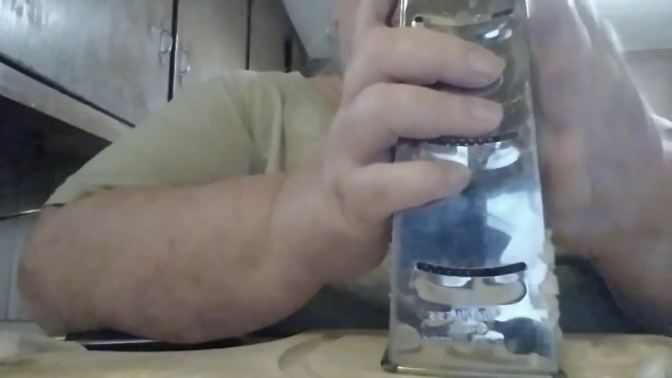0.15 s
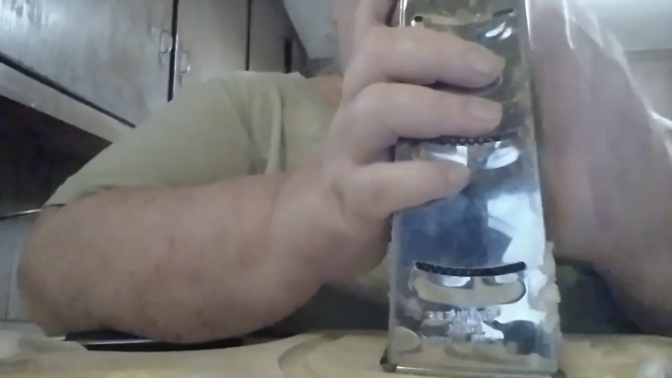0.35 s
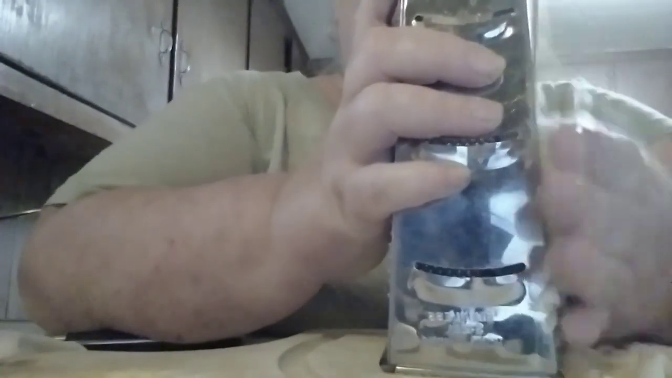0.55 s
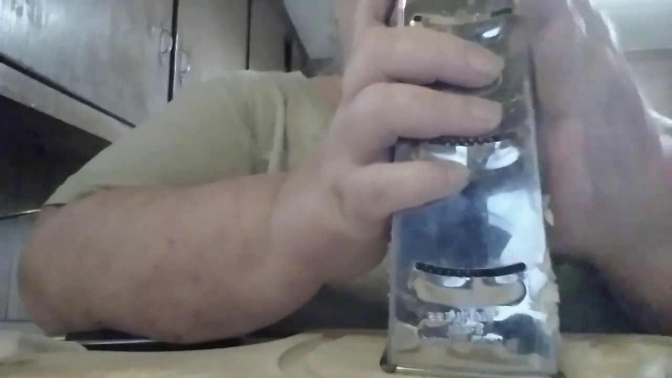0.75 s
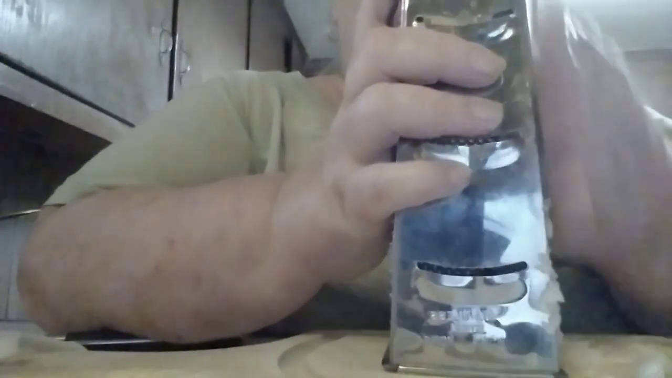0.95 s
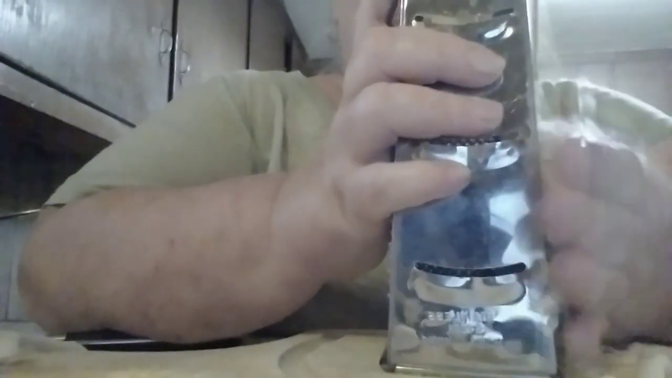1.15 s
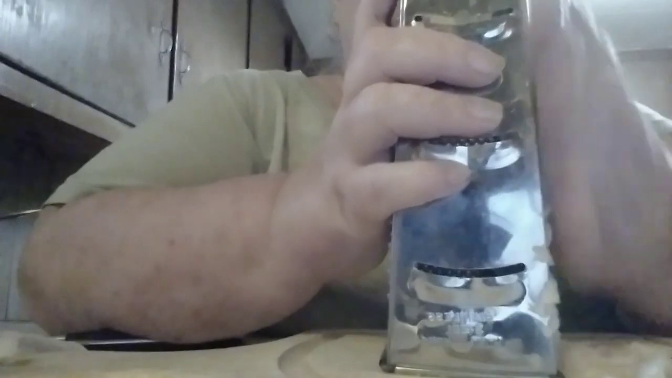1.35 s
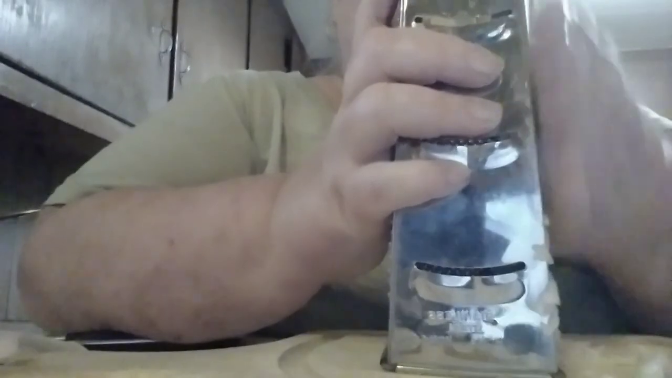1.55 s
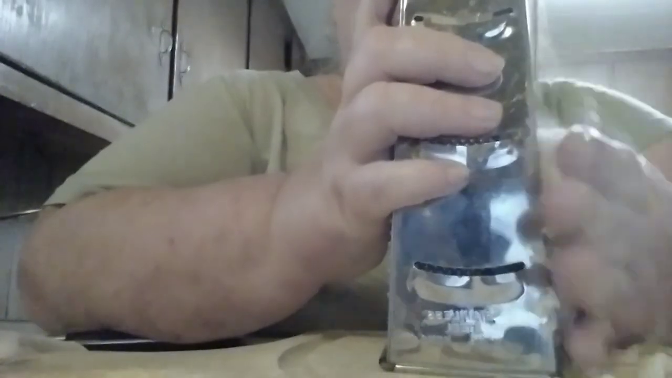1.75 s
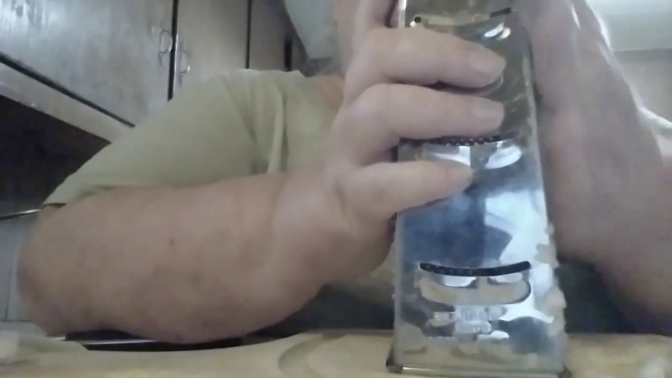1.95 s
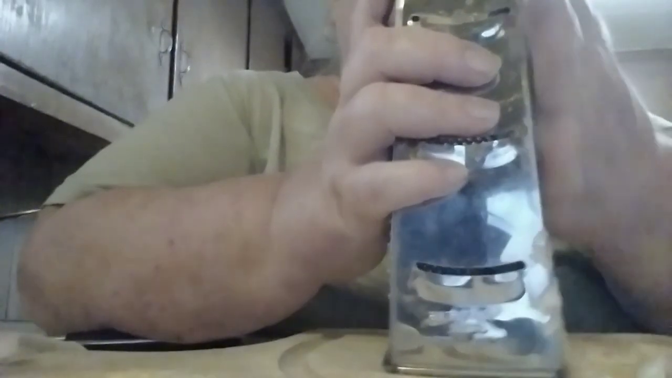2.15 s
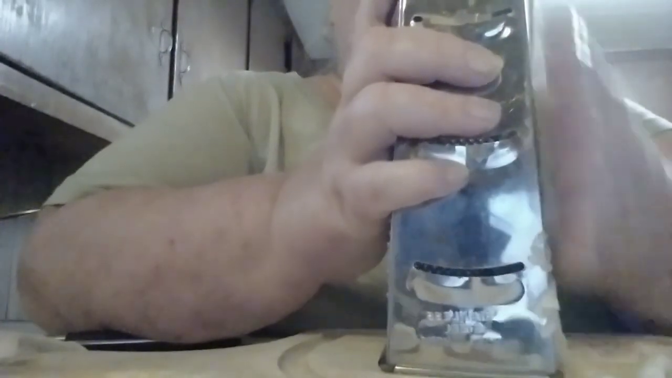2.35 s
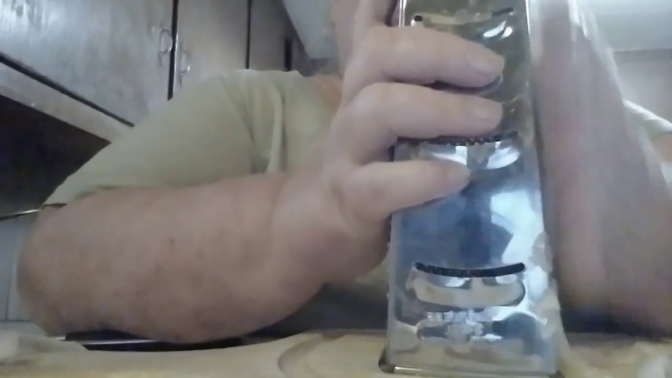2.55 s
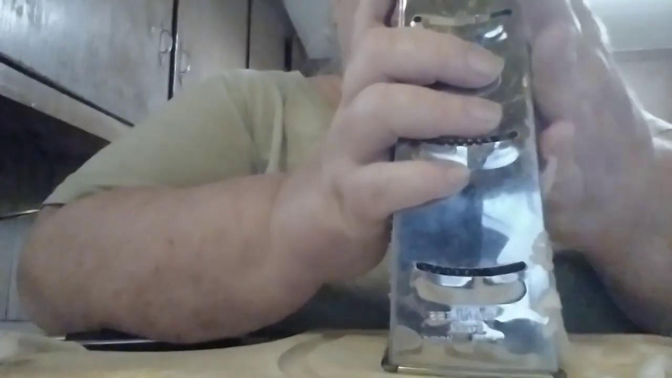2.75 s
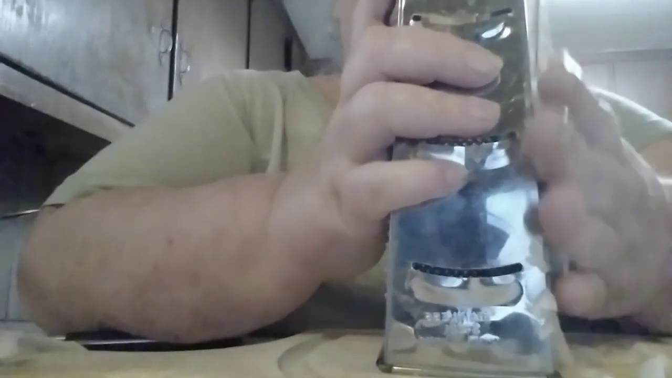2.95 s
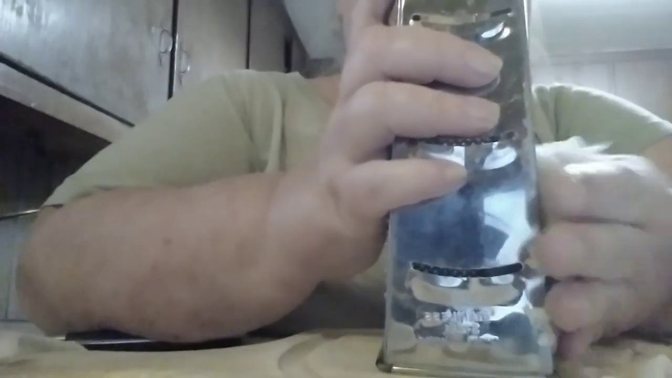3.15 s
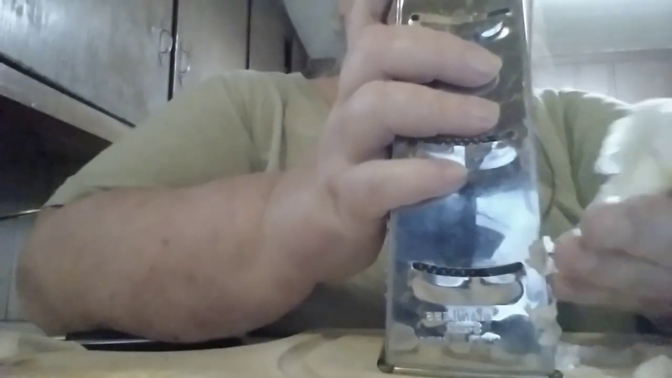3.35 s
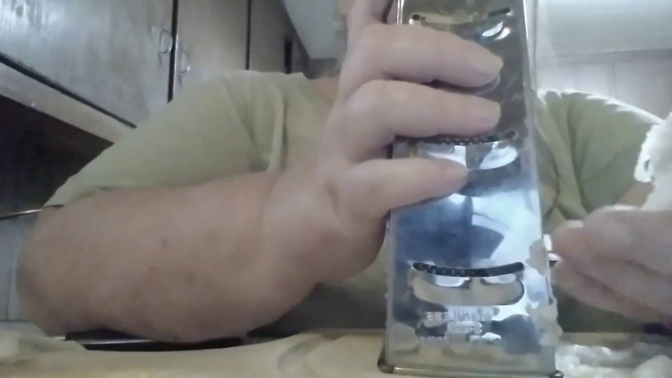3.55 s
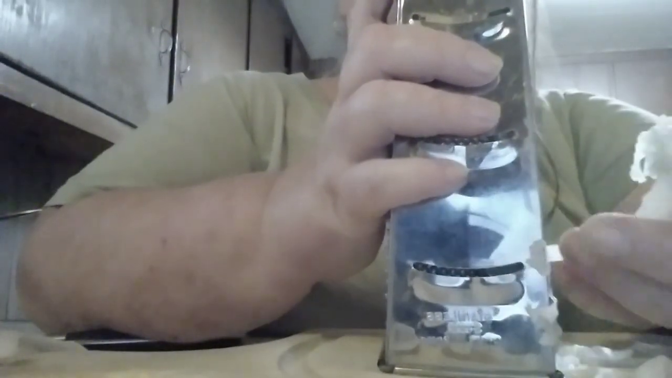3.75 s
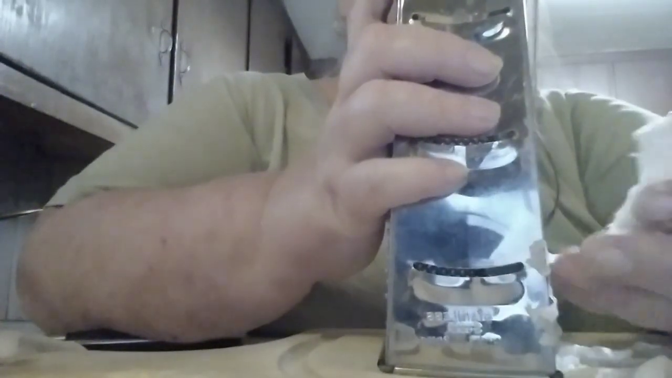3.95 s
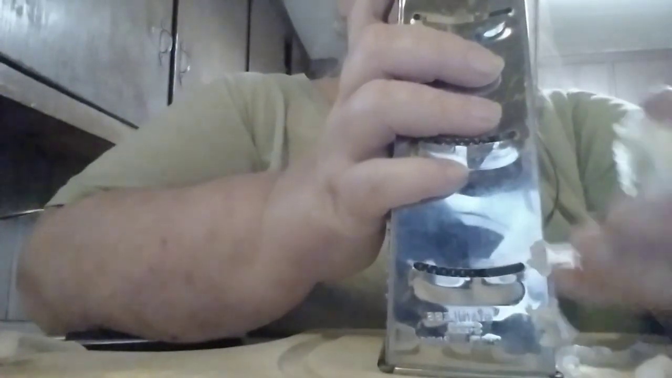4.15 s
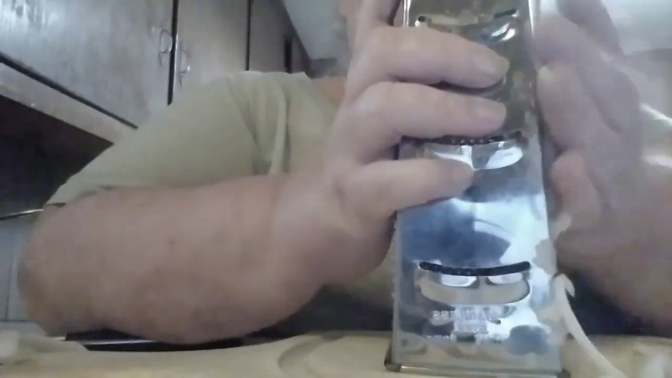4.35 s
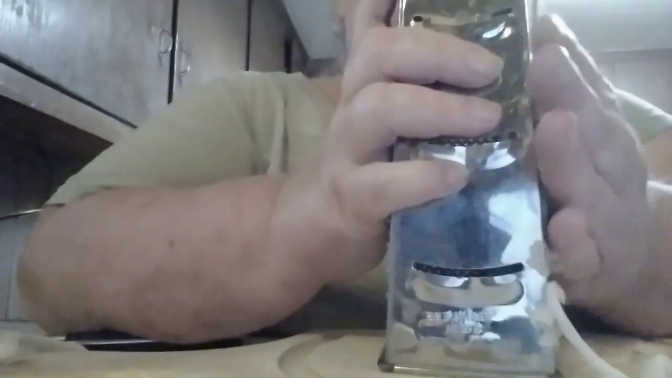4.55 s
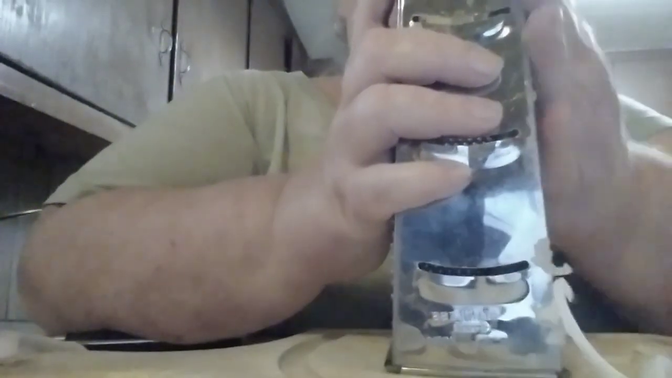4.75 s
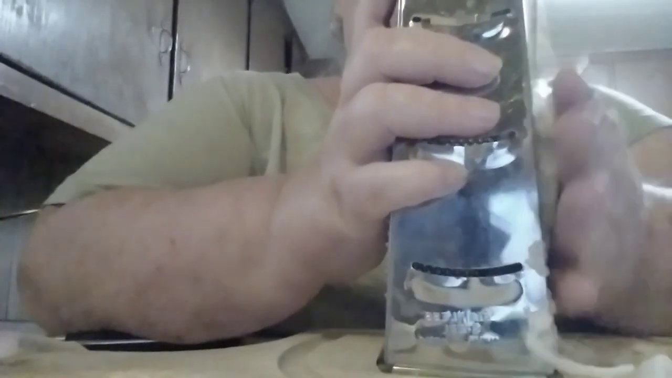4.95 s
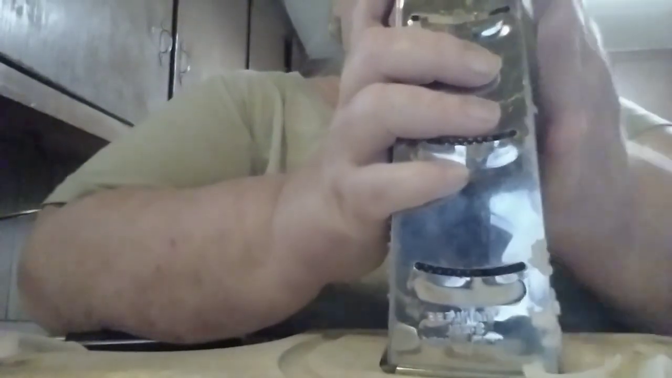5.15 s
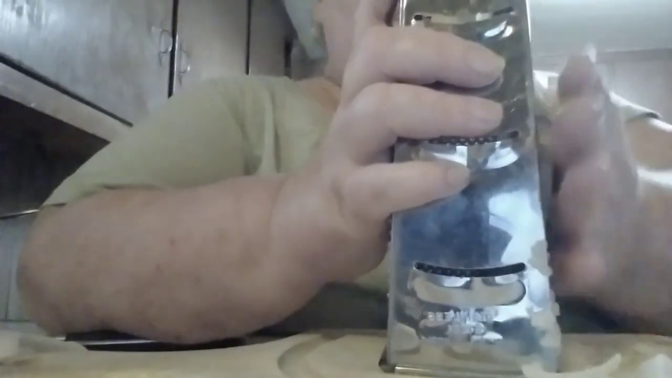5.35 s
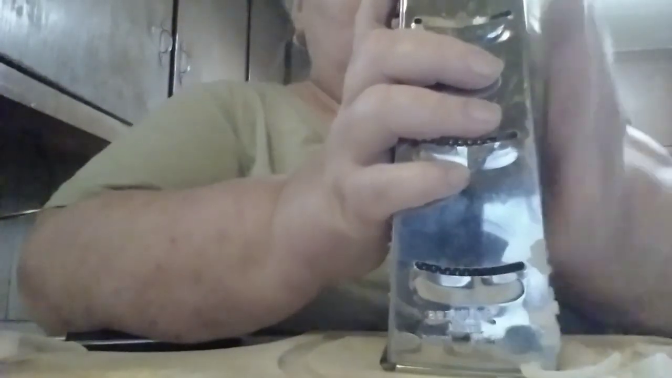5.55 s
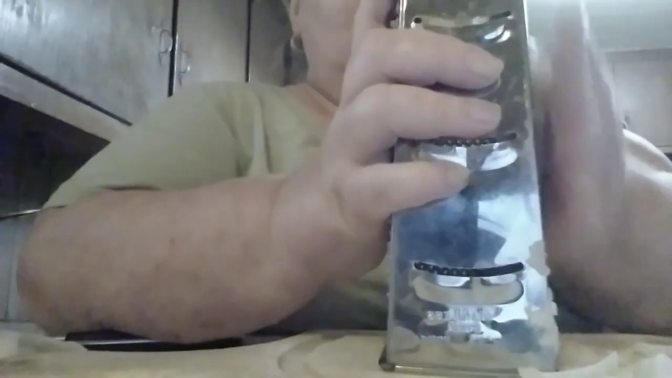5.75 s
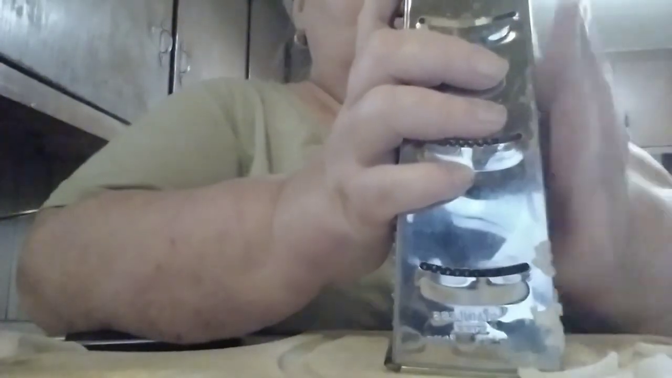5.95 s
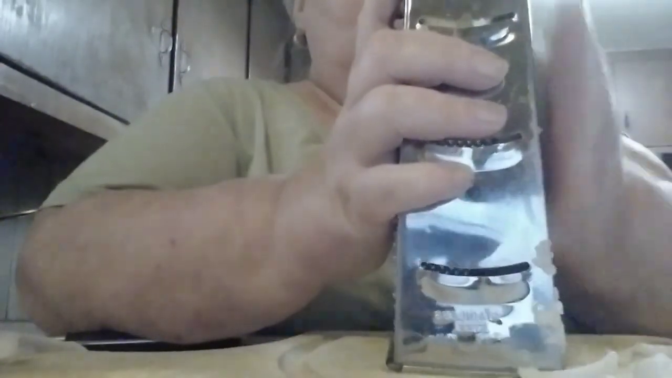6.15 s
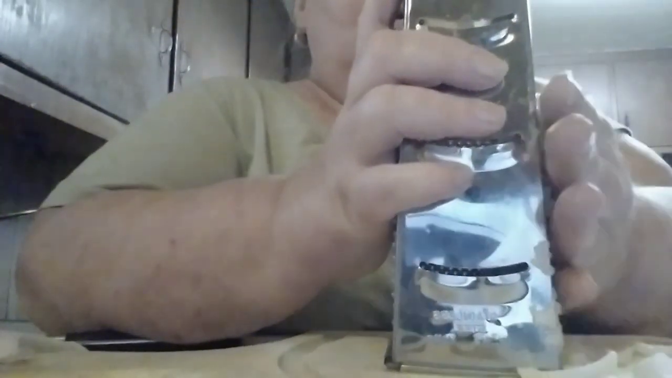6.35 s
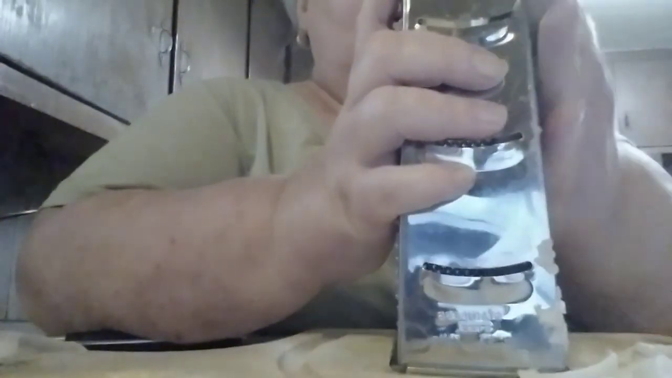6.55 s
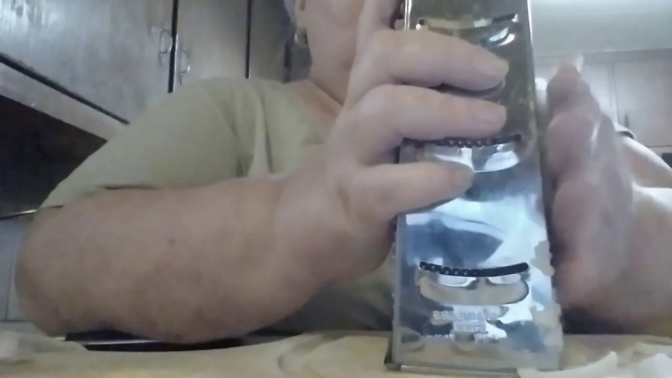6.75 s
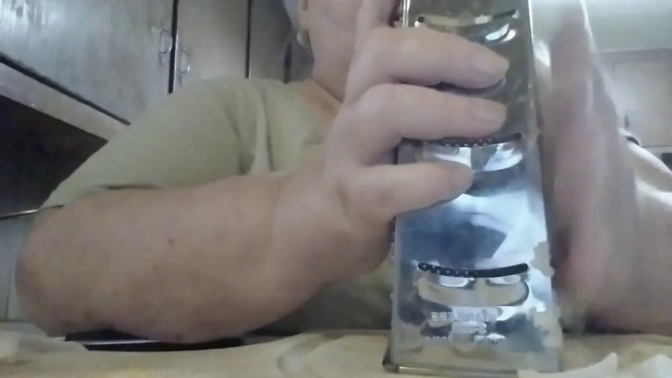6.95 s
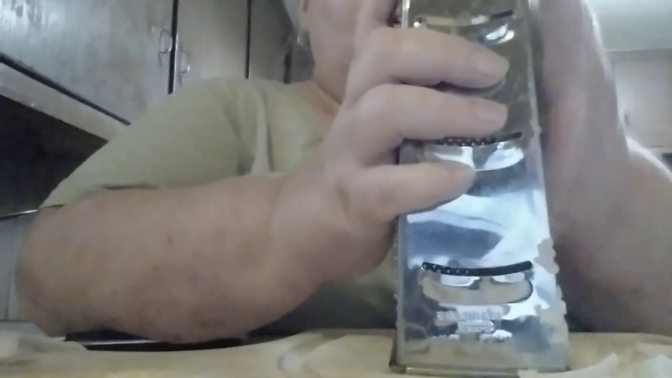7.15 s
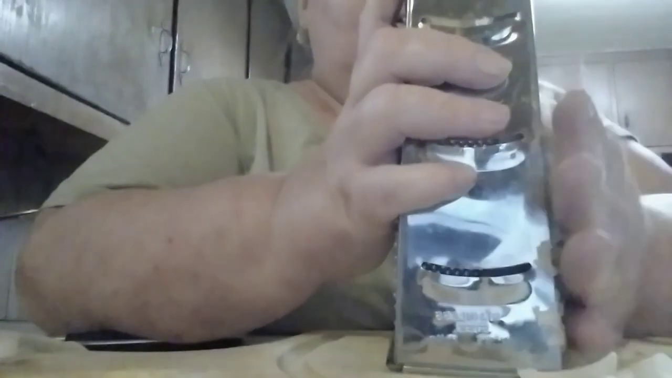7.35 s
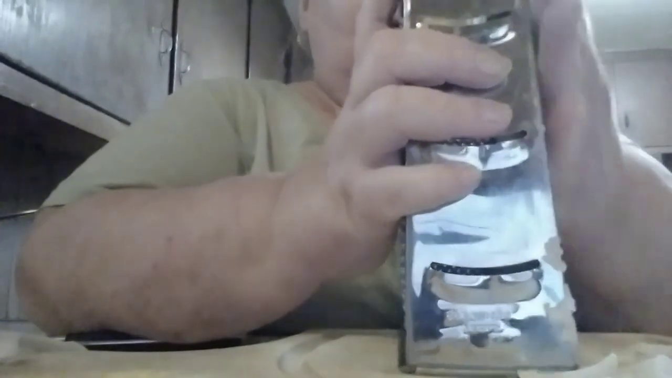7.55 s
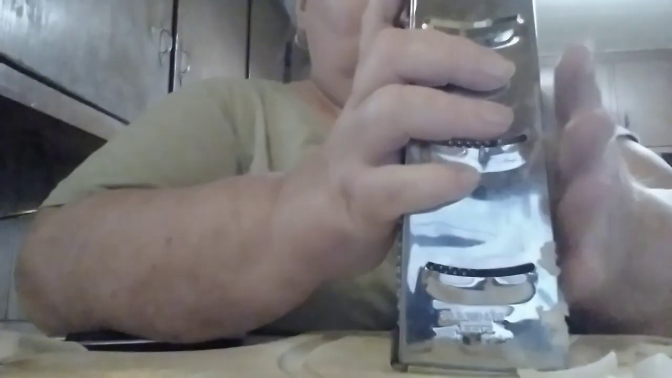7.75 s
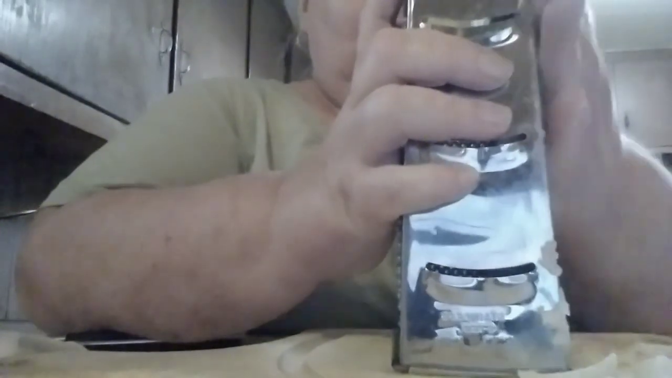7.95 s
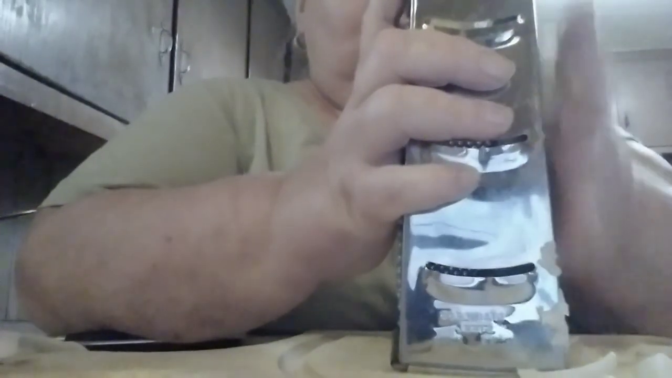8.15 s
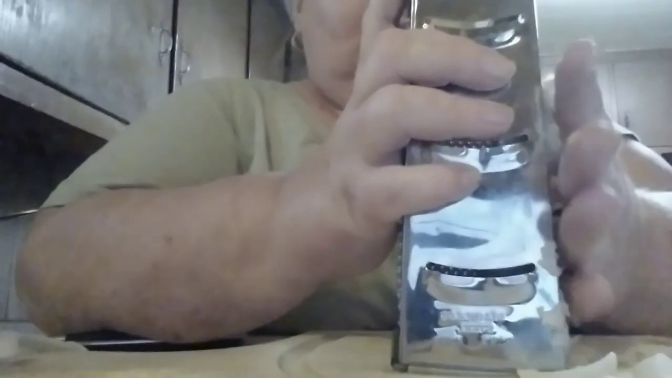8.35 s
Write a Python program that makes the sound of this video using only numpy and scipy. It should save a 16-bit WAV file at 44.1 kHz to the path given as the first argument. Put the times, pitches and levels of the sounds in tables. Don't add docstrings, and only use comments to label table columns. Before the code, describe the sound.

Close, dry sound in a quiet kitchen with low room tone and a faint fridge hum. From 0 to about 3.1 seconds an onion is rubbed on a steel box grater in quick strokes, roughly every 0.28 seconds: a short, bright, gritty tearing rasp downwards, then a weaker brushing skid upwards with small catches. The box rings hollowly around 1.2 kilohertz, the wooden board judders low beneath, and small teeth ping. The last two strokes come close together near 2.8 and 3.0. From 3.2 to 4.4 the grating stops; tiny creaks, a dry skin rustle at 3.6 and faint brushing around 4.2 to 4.4 are heard. Grating resumes at 4.45, slower, about every 0.34 seconds, with longer, louder, fuller rasps, particularly near 7.6. Sharp pings and hollow foot knocks punctuate it, notably around 4.9, and the strokes continue right to the cut-off at about 8.4.

```python
import sys
import numpy as np
from scipy import signal
from scipy.fft import rfft, irfft, next_fast_len
from scipy.io import wavfile
from scipy.ndimage import uniform_filter1d, map_coordinates

SR = 44100
rng = np.random.default_rng(int(sys.argv[2]) if len(sys.argv) > 2 else 0)


def transcribe(signal):
    frames = np.atleast_2d(signal).T
    limited = np.clip(frames, -1, 1)
    pcm = np.round(limited * 32767).astype(np.int16)
    wavfile.write(sys.argv[1], SR, pcm)


def invert_db(x):
    u = np.asarray(x, float) / 20
    return 10 ** u


N = 370881


# [t/s, level/dB]
LOAD = [(0, 0.5), (.3, -6), (.8, 7.5), (1.1, -8), (1.4, 1), (1.75, 5.5), (2.3, -2), (2.901, -3),
        (4.5, -4.5), (4.9, 4), (5.25, -16.5), (5.6, -1), (6.0, -1), (6.7, 1.5), (7.3, -1), (7.7, 5.5),
        (8.0, 0.5), (8.35, 0.5)]
# [t/s, level/dB]
DRAG = [(0, -15.5), (.35, -3), (.65, 0), (.95, -1), (1.25, -1.5), (1.5, 3), (1.8, -5), (2.1, -3.5),
        (2.4, -5), (2.7, -5), (4.3, -1.5), (4.7, 5.5), (5.4, 0.5), (5.75, -1.5), (6.1, -3), (6.75, -5),
        (7.45, 0.5), (8.1, -3)]


def grating():
    skid_gain, cut_gain, graze_gain, ring_gain, depth = hand()
    rows, clumps = tooth_rows(135, 0.22), wobble(60)
    load = invert_db(curve(LOAD))

    drive = np.hypot(0.096 * skid_gain, cut_gain + graze_gain)
    drive = uniform_filter1d(drive, size=300, origin=100)

    skid = skid_gain * skidding_skin(clumps)
    cut = invert_db(6.0) * cut_gain * torn_flesh(clumps, rows, depth, load)
    graze = invert_db(5.0 + curve(DRAG)) * graze_gain * brushed_flesh(clumps)
    box = invert_db(3.0) * ring_gain * drive * box_air(clumps, rows)
    rumble = invert_db(-4.5) * load * drive * wood_ringing(grit(2.8))
    return skid + cut + graze + box + rumble


# [f/Hz, level/dB per Hz]
SKID_COLOUR = [(2500, -44), (4200, -27), (4900, -21), (5050, -9), (6600, -5.5), (7900, -7), (11200, -17),
               (15200, -19.5), (15900, -23)]


def skidding_skin(clumps):
    jerks = 2.8 * np.minimum(wobble(380), 1.6)
    return patchy(filtered(grit(3.6) * invert_db(clumps + jerks), steel(SKID_COLOUR)), depth_db=2.0)


# [f/Hz, level/dB per Hz]
CUT_COLOUR = [(210, -61.5), (350, -4.5), (489, 2.5), (815, -40), (1210, -13.5), (2050, 1.5), (3260, 2),
              (4080, 4.5), (6790, 0), (10600, -4), (15800, -13)]


def torn_flesh(clumps, rows, depth, load):
    tears = grit(3.9) * invert_db(0.91 * clumps + 0.51 * rows + 1.4 * wobble(200))
    cut = patchy(filtered(tears, steel(CUT_COLOUR)), depth_db=2.0)
    cut = thinned(cut, np.clip(depth, 0, 1) ** 1.37)
    bass = filtered(cut, lambda f: 1 / (1 + (f / 750) ** 6))
    return cut + (load - 1) * bass


# [f/Hz, level/dB per Hz]
GRAZE_COLOUR = [(500, -0.5), (1500, -18.5), (2600, 1.5), (3300, -6), (4600, 1), (5300, -4), (6500, -8.5),
                (15800, -17.5)]


def brushed_flesh(clumps):
    return patchy(filtered(grit(3.5) * invert_db(3.4 * clumps), steel(GRAZE_COLOUR)), depth_db=5.0)


# [f/Hz, width/Hz, level/dB]
BOX_AIR = [(1069, 160, 2), (1237, 77, 9), (1326, 82, 6), (1870, 64, -3.5), (610, 770, -7)]


def box_air(clumps, rows):
    return patchy(filtered(grit(6.5) * invert_db(1.9 * clumps + 4.0 * rows), modes(BOX_AIR)), depth_db=4.5)


# [f/Hz, width/Hz, level/dB of lift]
SHEET = [(3260, 110, 5), (5750, 90, 3), (6700, 130, 6), (7630, 110, 3), (8085, 70, 5), (9450, 90, 3)]


def steel(spectrum):
    def response(f):
        lift_db = sum(db / (1 + ((f - centre) / width) ** 2) for centre, width, db in SHEET)
        return invert_db(along(spectrum, f) + lift_db)
    return response


def tooth_rows(rate_hz, drift):
    return np.cos(2 * np.pi * np.cumsum(rate_hz * np.exp(drift * wobble(25))) / SR)


def thinned(x, depth):
    shallow_hz, deep_hz = 4600, 1690
    hz, t, z = signal.stft(x, SR, nperseg=256)
    share = np.interp(t, np.arange(N) / SR, depth)
    edge_hz = deep_hz + (shallow_hz - deep_hz) * (1 - share) ** 1.4
    loss = (1 - share ** 2) / (1 + (hz[:, None] / edge_hz) ** 6)
    return signal.istft(z * (1 - loss), SR, nperseg=256)[1][:N]


def patchy(x, depth_db):
    z = signal.stft(x, nperseg=256)[2]
    field = uniform_filter1d(uniform_filter1d(rng.standard_normal(z.shape), 4, 0), 9, 1)
    return unit(signal.istft(z * invert_db(depth_db * unit(field)), nperseg=256)[1][:N])


# [t/s, level/dB]
GRIP = [(0, -6), (.25, -11.5), (.55, -2.5), (.85, -0.5), (1.35, -3.5), (1.7, -4), (2.0, -5.5), (2.3, -8.5),
        (3.0, -7), (4.2, -23), (4.6, -1.5), (4.95, -1.5), (5.3, -4.5), (6.0, -4.5), (6.3, -8), (6.9, -2),
        (7.4, -8.5), (7.65, -10), (7.9, -6.5), (8.35, -10)]


def hand():
    t = control_times()
    down_skid, cut, depth = down_strokes(t)
    up_skid, up_graze = up_strokes(t)
    catch_skid, snagged = catches(t)
    skid = down_skid + up_skid + catch_skid
    graze = up_graze + snagged
    ring = invert_db(np.interp(t, *np.transpose(GRIP)) + 4.5 * snagged / (cut + graze))
    scrapes = surges(t) * np.sqrt([skid, cut, graze])
    return [full_rate(gain) for gain in (*scrapes, ring, depth)]


# [t/s of full contact, hold/s, skid level/dB, cut level/dB, time to full depth/s]
DOWN_STROKES = [(0, 0.016, -44, -37, 0.0079), (0.216, 0.058, -40.5, -39.5, 0.031),
                (0.472, 0.074, -39, -39.5, 0.032), (0.773, 0.05, -41, -36, 0.055),
                (1.059, 0.054, -42.5, -38, 0.057), (1.331, 0.065, -39, -38.5, 0.024),
                (1.64, 0.059, -40, -36.5, 0.056), (1.917, 0.069, -42.5, -36, 0.07),
                (2.213, 0.093, -37.5, -44, 0.058), (2.505, 0.078, -38.5, -38.5, 0.047),
                (2.823, 0.089, -34.5, -35, 0.057), (2.974, 0.059, -38.5, -37.5, 0.042),
                (4.456, 0.067, -43, -44.5, 0.043), (4.799, 0.11, -34.5, -36, 0.068),
                (5.145, 0.13, -35.5, -37.5, 0.049), (5.536, 0.12, -30, -37, 0.046),
                (5.871, 0.14, -35.5, -37.5, 0.051), (6.228, 0.089, -32.5, -34.5, 0.081),
                (6.564, 0.1, -33.5, -42, 0.035), (6.893, 0.091, -34, -37, 0.096),
                (7.224, 0.12, -33, -37, 0.076), (7.589, 0.098, -31.5, -32, 0.083),
                (7.926, 0.094, -34, -35.5, 0.08), (8.262, 0.092, -34, -40, 0.065)]


def down_strokes(t):
    s, hold, skid_db, cut_db, depth_s = columns(DOWN_STROKES)
    cut_db = cut_db - 0.5
    pressed = contact(t, s, hold, rise=740, fall=1070)
    shallow_db = np.minimum(0, 147.4 * (t - s - depth_s))
    skid = power(skid_db + pressed + 0.071 * shallow_db)
    cut = power(cut_db + pressed + shallow_db)
    return skid, cut, np.sqrt(cut / power(cut_db + pressed))


# [t/s, length/s, skid level/dB at start, skid level/dB at end]
UP_STROKES = [(-0, 0.099, -54, -76), (0.265, 0.14, -51, -51), (0.557, 0.1, -49.5, -62),
              (0.818, 0.16, -47, -59), (1.11, 0.11, -60.5, -46), (1.414, 0.052, -40, -50),
              (1.704, 0.15, -42.5, -47.5), (1.984, 0.25, -41.5, -63), (2.317, 0.1, -63, -38),
              (2.576, 0.092, -47.5, -61), (2.911, 0.042, -59.5, -41), (3.01, 0.19, -38, -80),
              (4.528, 0.088, -52.5, -46.5), (4.921, 0.15, -69, -42.5), (5.269, 0.107, -47, -60),
              (5.673, 0.15, -51.5, -59), (6.026, 0.064, -46, -48), (6.343, 0.076, -46, -59),
              (6.66, 0.068, -58, -52.5), (6.987, 0.084, -48.5, -60), (7.329, 0.22, -45, -51.5),
              (7.689, 0.097, -49.5, -55.5), (8.019, 0.078, -54, -51), (8.357, 0.048, -62, -54)]


def up_strokes(t):
    s, length, from_db, to_db = columns(UP_STROKES)
    slide = np.clip((t - s) / length, 0, 1)
    back_db = from_db + (to_db - from_db) * slide + contact(t, s, length, rise=770, fall=520)
    return power(back_db), power(back_db - 10.5)


# [t/s, length/s, skid level/dB, graze level/dB, sag/dB]
CATCHES = [(0.048, 0.074, -46.5, -50.5, 0.5), (0.317, 0.044, -46.5, -59, -17),
           (0.632, 0.044, -57.5, -64.5, -12), (0.907, 0.038, -53.5, -57, -3),
           (1.219, 0.0036, -43, -58.5, -2), (1.511, 0.036, -42, -62.5, 7.5),
           (2.061, 0.056, -44, -55.5, 0.5), (2.35, 0.022, -49, -59, -1), (2.672, 0.085, -50, -55.5, 5.5),
           (3.608, 0.076, -79.5, -82, 15), (3.807, 0.04, -81.5, -76, 8), (4.197, 0.135, -68, -67, 9),
           (4.326, 0.12, -61, -63, -4.5), (4.673, 0.068, -44, -57.5, 0.5), (4.916, 0.18, -61.5, -52.5, 4.5),
           (5.374, 0.073, -44, -54.5, -5.5), (5.765, 0.042, -43.5, -59, -9.5),
           (6.103, 0.07, -44, -56.5, 10.5), (6.423, 0.074, -47, -57, -1.5), (6.78, 0.055, -49, -61, 6.5),
           (7.105, 0.057, -46, -59, -2), (7.472, 0.052, -44.5, -61.5, 11.5), (7.808, 0.062, -46, -57, 4),
           (8.128, 0.05, -43, -54.5, 3)]


def catches(t):
    s, length, skid_db, graze_db, sag_db = columns(CATCHES)
    sag = sag_db * (0.5 - np.clip((t - s) / length, 0, 1))
    caught = contact(t, s, length, rise=1000, fall=520) + sag
    return power(skid_db + caught), power(graze_db + caught)


# [t/s, level/dB]
SURGES = [(.133, -4.5), (0.224, -6), (.249, 1.5), (.361, -5), (0.836, 4), (1.103, -3.5), (1.161, 4.5),
          (1.313, 9.5), (1.368, 3.5), (1.517, -5), (1.707, 4), (1.797, 4.5), (1.963, 0.5), (2.001, 6.5),
          (2.059, 2), (2.193, -8.5), (2.421, -7), (2.524, -4), (2.578, -1), (2.682, -5), (2.905, -8),
          (2.933, 8), (3.037, -3), (4.519, 1), (4.587, 0), (4.778, 3), (4.895, -3), (5.062, 4.5),
          (5.148, -8.5), (5.182, 0), (5.267, -4.5), (5.403, -7), (5.549, -9), (5.592, -4.5), (5.633, 3),
          (5.684, 3.5), (5.816, 3), (5.851, 2.5), (5.878, 2.5), (5.973, 1), (6.156, 1.5), (6.254, 2.5),
          (6.313, -4), (6.456, 6), (6.654, -2.5), (6.889, 2), (7.225, 1), (7.354, -6), (7.506, 3.5),
          (7.595, -3), (7.636, -1), (7.683, -4.5), (7.948, 0.5), (7.977, 0.5), (8.01, -5), (8.156, -2),
          (8.263, 1), (8.298, -3), (8.353, -1.5)]


def surges(t):
    s, db = columns(SURGES)
    return invert_db(np.sum(db * np.exp(-0.5 * ((t - s) / 0.0074) ** 2), axis=0))


def contact(t, start, length, rise, fall):
    return np.minimum(0, np.minimum(rise * (t - start), fall * (start + length - t)))


# [t/s, length/s, level/dB]
FINE_HISS = [(.14, .04, 1), (0.385, 0.055, -10), (0.694, .04, 2.5), (.98, .03, -2.5), (1.4, 0.13, 1),
             (1.51, 0.045, -6.5), (1.842, 0.068, -3.5), (2.42, .06, 0.5), (3.06, .1, -5.5),
             (4.19, 0.074, 2.5), (4.322, 0.11, 5.5), (4.648, 0.058, 3.5), (5.477, 0.024, 1.5),
             (5.701, .07, 2.5), (6.059, 0.04, 1.5), (6.496, 0.055, -13.5), (6.7, .06, 3), (6.788, 0.079, -27),
             (7.03, .06, -0.5), (7.518, 0.025, -0.5), (7.809, .06, 4.5), (8.042, 0.032, -2.5)]


def vary_fine_hiss(x):
    s, length, db = columns(FINE_HISS)
    presence = invert_db(contact(control_times(), s, length, rise=720, fall=720))
    hiss_db = full_rate(np.sum(db * presence, axis=0))
    finest = filtered(x, lambda f: 1 / (1 + (9300 / (f + 1)) ** 24))
    return x + finest * (invert_db(hiss_db) - 1)


# [t/s, peak level/dB, f/Hz]
RINGS = [(0.2044, -47, 1110), (0.2423, -34, 1420), (0.376, -46, 1310), (1.105, -43, 1110),
         (1.1982, -50, 1270), (1.312, -50, 1280), (1.3512, -26, 1194), (2.241, -40, 1240),
         (2.6763, -38.5, 1080), (5.0622, -32, 1280), (6.8862, -38, 1240), (7.3244, -29, 1217),
         (7.464, -39, 1090), (7.6071, -39, 1290), (7.6658, -28, 1010)]


def rings():
    out, t = np.zeros(N + SR), np.arange(4096) / SR
    for s, db, hz in RINGS:
        ring = invert_db(-60 * t / 0.038) * np.sin(2 * np.pi * hz * t) * (1 - np.exp(-t / 0.0012))
        slap = rng.standard_normal(len(t)) * invert_db(-60 * t / 0.039)
        add_hit(out, s, db - 4.5, signal.fftconvolve(slap, ring)[:len(t)])
    return out[:N]


# [t/s, peak level/dB, f/Hz]
TICKS = [(0.315, -23.5, 5800), (.5616, -35, 4900), (0.7652, -34, 5200), (0.9418, -30, 5520),
         (1.153, -28, 6770), (1.209, -31, 7300), (1.502, -33, 6040), (1.9489, -16, 6080),
         (2.004, -20, 4300), (2.0843, -29.5, 6800), (2.213, -20.5, 6550), (2.2643, -33, 6900),
         (2.332, -28, 7500), (2.3427, -29, 6230), (2.3536, -25.5, 6420), (2.389, -31, 7860),
         (2.393, -26.5, 7160), (2.6943, -33, 7000), (2.704, -22, 7000), (2.7292, -40, 6850),
         (2.7566, -32.5, 10500), (4.1875, -38, 6700), (4.1985, -34.5, 6850), (4.2101, -45, 6910),
         (4.3378, -39, 8600), (4.35, -45, 4060), (4.529, -22.5, 3380), (4.5753, -28.5, 7600),
         (4.603, -30, 6560), (4.6638, -30, 5400), (4.6736, -27, 6530), (4.7803, -27, 6770),
         (4.8074, -14.5, 5750), (5.006, -24, 7580), (5.0521, -26, 6460), (5.419, -38, 7820),
         (5.433, -29, 6600), (5.4618, -30.5, 7960), (5.5325, -46, 7000), (5.769, -32, 7620),
         (5.6354, -9, 7200), (5.859, -22, 5390), (5.9109, -9.5, 7000), (6.1171, -40, 7980),
         (6.149, -27, 6660), (6.1767, -23, 7270), (6.2208, -19, 8500), (6.4407, -28, 7340),
         (6.567, -17, 7020), (6.6134, -27, 6980), (6.8307, -28, 5290), (6.8863, -27, 8300),
         (7.4988, -27.5, 5420), (7.809, -30, 10460), (7.872, -34, 5760), (8.137, -20.5, 6900),
         (8.186, -26, 8230), (8.2806, -10, 4200), (8.3046, -26, 6800), (8.4011, -36, 7460)]


def ticks():
    out, t = np.zeros(N + SR), np.arange(1024) / SR
    for s, db, hz in TICKS:
        ping = invert_db(-60 * t / 0.0051) * np.sin(2 * np.pi * hz * t) * (1 - np.exp(-t / 0.0003))
        fading = invert_db(-10.5 - 60 * t / 0.0053) + invert_db(-10.5 - 60 * t / 0.04)
        snap = filtered(fading * rng.standard_normal(len(t)), modes([(7000, 3050, 0.01)]))
        add_hit(out, s - 0.0003, min(db - 1.0, -17), ping + snap)
    return out[:N]


# [f/Hz, width/Hz, level/dB]
BOARD = [(65, 7.3, 0), (113, 70.4, -2), (186, 65, -2), (274, 39, -12.5)]


def wood_ringing(push):
    return unit(filtered(push, modes(BOARD)))


# [t/s of peak, level/dB, f/Hz, rise/s, fall/s]
JOLTS = [(0.013, -26.5, 113, 0.052, 0.0078), (0.254, -31, 156, .014, 0.0092),
         (0.554, -28.5, 113, 0.0099, 0.0061), (0.838, -34.5, 115.5, 0.049, 0.012),
         (1.118, -42.5, 162.5, 0.065, 0.016), (1.365, -26.5, 116.3, 0.01, 0.017),
         (1.738, -39, 111, 0.056, 0.036), (1.991, -42.5, 127.4, 0.011, 0.012),
         (2.578, -32, 131.4, 0.022, 0.0062), (2.882, -31, 136, 0.015, 0.012),
         (3.017, -34.5, 139.3, 0.031, 0.0097), (3.781, -52, 171, 0.028, 0.031),
         (4.942, -28.5, 101, 0.008, 0.015), (5.189, -32.5, 123.4, 0.018, 0.013),
         (5.232, -35.5, 139.8, 0.032, 0.037), (5.611, -30, 135.6, 0.011, 0.026),
         (5.94, -28.5, 132.6, 0.015, 0.018), (6.357, -42.5, 101, 0.019, 0.015),
         (6.992, -29.5, 96.5, 0.0046, 0.0068), (7.341, -28, 131, 0.01, 0.016),
         (7.671, -34, 140.6, 0.03, 0.038), (8.001, -31.5, 156, 0.0075, 0.0051),
         (8.355, -49.5, 123.3, 0.017, 0.028)]
# [t/s of peak, level/dB, f/Hz]
TREMORS = [(0.067, -34.5, 97), (0.518, -28, 140.5), (1.044, -46, 160.3), (1.59, -41, 124.4),
           (2.846, -36.5, 126), (2.911, -30.5, 111), (2.942, -44, 128), (4.513, -39, 133),
           (4.758, -41, 130), (4.825, -38, 132.7), (4.991, -30, 120.2), (5.649, -35, 127.4),
           (6.291, -33, 147.5), (6.319, -36, 117), (6.577, -41, 134), (6.671, -43, 123),
           (6.849, -40.5, 158), (7.253, -36, 156.4), (7.545, -40.5, 192), (.275, -42, 130.3),
           (1.404, -33, 119.6), (7.618, -35, 125), (7.696, -39, 132)]


def board():
    before = 4000
    out, t = np.zeros(N + SR), np.arange(-before, 8000) / SR
    thump = wood_ringing(rng.standard_normal(N + SR))
    tremor_rise_s, tremor_fall_s = 0.0049, 0.007
    shakes = [*JOLTS, *[(*row, tremor_rise_s, tremor_fall_s) for row in TREMORS]]
    for s, db, hz, rise, fall in shakes:
        swell = invert_db(-9 * np.where(t < 0, -t / rise, t / fall) ** 1.45)
        swell += invert_db(-15.5 - 60 * abs(t) / np.where(t < 0, rise, 0.3))
        cycles = np.sin(2 * np.pi * hz * t * (1 - 0.93 * t) + rng.uniform(0, 2 * np.pi))
        at = slice(round(s * SR), round(s * SR) + len(t))
        out[at] += invert_db(db + 2.5) * swell * (cycles + 0.48 * thump[at])
    return out[before:N + before]


# [t/s, peak level/dB, sharpness/dB, hollowness/dB, rattle/dB]
KNOCKS = [(0.051, -37.5, -22, -1, -0.5), (1.582, -35.5, -29, 1, 5.5), (1.727, -23, -36, 3.5, -8.5),
          (4.503, -31.5, -17, 0.8, -15), (4.747, -51.5, -9, -4.5, 14.5), (4.928, -21, -8, 5.5, -9.5),
          (4.985, -25.5, -12, -0.5, 0), (5.058, -39.5, -15, 2, 11), (6.192, -38, -26, 1.5, 5.7),
          (6.528, -36.5, -19, -4.5, 4.5), (6.838, -29.5, -10, 2.7, 4.5), (7.154, -28.5, -4.5, 3, 5),
          (7.5211, -30.5, 1.5, 1.5, 1.5), (8.206, -32.5, -36, -0.5, 2)]
# [f/Hz, width/Hz, level/dB]
FOOT = [
    (736, 187, 9.5),
    (1190, 200, 4.5),
    (1930, 700, 1.5),
    (3280, 2800, -22),
]


def knocks():
    out, t = np.zeros(N + SR), np.arange(4096) / SR

    def blow(s):
        return np.exp(-0.5 * ((t - s) / 0.00009) ** 2)

    for s, db, sharp_db, hollow_db, rattle_db in KNOCKS:
        chance = rng.standard_normal(3)
        blows = 0.98 * blow(0.00079) + blow(0.00242 + 0.00019 * chance[0])
        blows += 0.55 * blow(0.00504 + 0.00044 * chance[1])
        lifts = (-hollow_db, hollow_db, 2 * chance[2])
        foot = [(hz, width, level + lift) for (hz, width, level), lift in zip(FOOT, lifts)]
        dull, sharp = filtered(blows, modes(foot)), filtered(blows, twice(FOOT[3:]))
        shaking = rng.standard_normal(len(t)) * invert_db(-60 * t / 0.14)
        rattle = 0.17 * invert_db(rattle_db) * filtered(shaking, modes(foot + [(364, 130, 7.9)]))
        hit = (dull + rattle) / abs(dull).max() + invert_db(sharp_db) * sharp / abs(sharp).max()
        out[round((s - 0.001) * SR):][:len(t)] += invert_db(db + 2.5) * hit
    return out[:N]


# [t/s, peak level/dB, level/dB of low groan over it]
CREAKS = [(3.115, -56.5, 8.5), (3.358, -54.5, -9), (3.394, -57, -4.5), (3.756, -61, -12), (3.797, -55, -13),
          (3.949, -71, -13), (4.029, -63.5, -12), (4.07, -64.5, -10), (4.111, -61, -10), (4.14, -61, -9),
          (4.18, -64, 3.5), (4.26, -56.5, 6), (4.379, -57, -9)]
# [t/s, level/dB, time to fall 60 dB/s]
PEEL = (3.598, -52, .22)


def handling():
    t = control_times()

    def nudges(groaning):
        swells = [invert_db(db - 5.0 + groaning * low_db) * np.exp(-0.5 * ((t - s - 0.012) / 0.013) ** 2)
                  for s, db, low_db in CREAKS]
        return full_rate(sum(swells))

    slips = grit(1.5)
    creak = unit(filtered(slips, twice([(880, 83, 7.0), (2300, 1100, -3.5)])))
    groan = unit(filtered(slips, twice([(503, 200, 0.01)])))
    peel_s, peel_db, peel_t60_s = PEEL
    since = np.maximum(np.arange(N) / SR - peel_s, 0)
    peel = unit(filtered(grit(1.3), lambda f: 1 / (1 + (12200 / (f + 1)) ** 30)))
    peel = invert_db(peel_db - 60 * since / peel_t60_s) * (1 - np.exp(-since / 0.01)) * peel
    return nudges(0) * creak + nudges(1) * groan + peel


# [f/Hz, time to fall 60 dB/s]
KITCHEN = [
    (200, 0.17),
    (2000, 0.12),
    (10000, 0.15),
]


def kitchen(x):
    hz, t, z = signal.stft(rng.standard_normal(SR // 2), SR, nperseg=256)
    tail = signal.istft(z * invert_db(-60 * t / along(KITCHEN, hz)[:, None]), SR, nperseg=256)[1]
    return signal.fftconvolve(np.pad(x, (300, 0)), tail / np.linalg.norm(tail))[:N]


# [f/Hz, level/dB per Hz]
ROOM_TONE = [(25, -18), (70, 2), (130, -3), (220, -0.5), (400, -8), (600, -13.5), (900, -17), (1150, -24.5),
             (2200, -25.5), (3800, -29), (7500, -34), (10000, -41.5), (15800, -44)]
# [f/Hz, width/Hz, level/dB]
FRIDGE = [(269.1, 23, 0.5), (350.3, 22, -2.5), (409, 45, -4.5)]


def background():
    tone = unit(filtered(rng.standard_normal(N), lambda f: invert_db(along(ROOM_TONE, f))))
    hum = unit(filtered(rng.standard_normal(N), twice(FRIDGE)))
    whine = unit(filtered(rng.standard_normal(N), twice([(7200, 65, 0)])))
    motor = np.sin(2 * np.pi * np.cumsum(269.3 + 3 * wobble(8)) / SR)
    room = invert_db(-61.3 + 1.2 * wobble(7)) * tone + invert_db(-96) * whine
    return room + invert_db(-62 + 1.2 * wobble(3.3)) * hum + invert_db(-68 + 4 * wobble(14)) * motor


def unit(x):
    return x / np.sqrt(np.mean(x ** 2) + 1e-20)


def power(db):
    return np.sum(invert_db(2 * np.maximum(db, -140)), axis=0)


def columns(table):
    return np.transpose(table)[..., None]


def control_times():
    return np.arange(0, N + 32, 32) / SR


def full_rate(x):
    return np.interp(np.arange(N) / SR, control_times(), x)


def curve(points):
    return np.interp(np.arange(N) / SR, *np.transpose(points))


def along(points, hz):
    f, value = np.transpose(points)
    return np.interp(np.log(hz + 1), np.log(f + 1), value)


def wobble(rate):
    return map_coordinates(rng.standard_normal(4000), [np.arange(N) * min(rate, 400) / SR])


def grit(spread_db):
    sizes = invert_db(spread_db * np.clip(rng.standard_normal(N), -3, 2.6))
    return unit(rng.standard_normal(N) * sizes)


def filtered(x, response):
    m = next_fast_len(len(x) + SR // 2)
    return irfft(rfft(x, m) * response(np.fft.rfftfreq(m, 1 / SR)), m)[:len(x)]


def modes(rows):
    def response(f):
        return sum((-1) ** k * invert_db(db) * 1j * f * width / (hz * hz - f * f + 1j * f * width)
                   for k, (hz, width, db) in enumerate(rows))
    return response


def twice(rows):
    return lambda f: modes(rows)(f) ** 2


def add_hit(out, s, db, hit):
    out[round(s * SR):][:len(hit)] += invert_db(db) * hit / abs(hit).max()


def scene():
    scrape, shake = vary_fine_hiss(grating()), board()
    chopped = scrape * np.exp(np.clip(4.7 * shake, -1, 1))
    near = chopped + shake + knocks() + ticks() + handling() + rings()
    return (near + invert_db(-15.0) * kitchen(near) + background())[None]


def low_pass(x):
    return signal.sosfilt(signal.butter(12, 16310, fs=SR, output="sos"), x)


def record(dry):
    mix = filtered(dry[0], lambda f: (f < 15850) / (1 + (30 / (f + 1)) ** 4))[None]
    return low_pass(mix)


dry = scene()
out = record(dry)
transcribe(out)
```